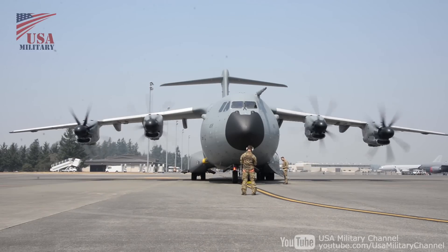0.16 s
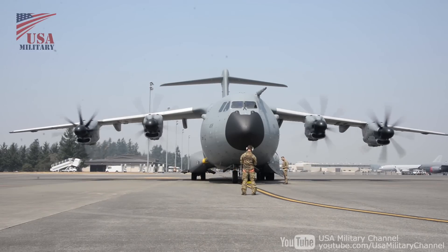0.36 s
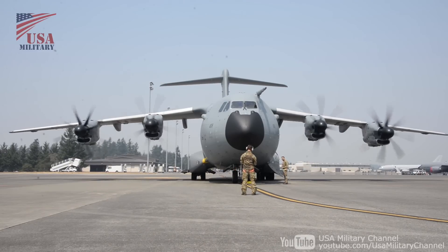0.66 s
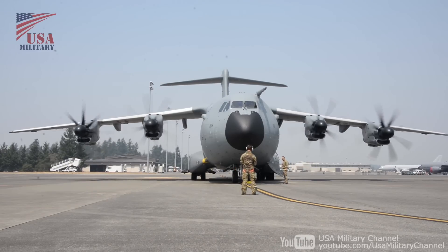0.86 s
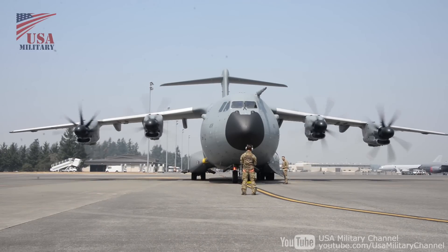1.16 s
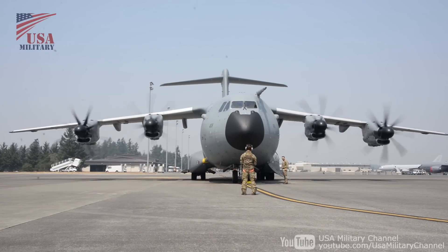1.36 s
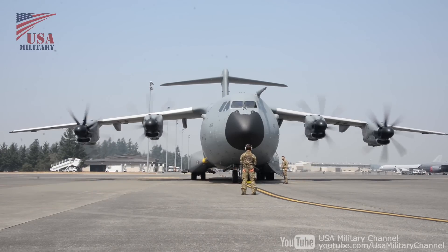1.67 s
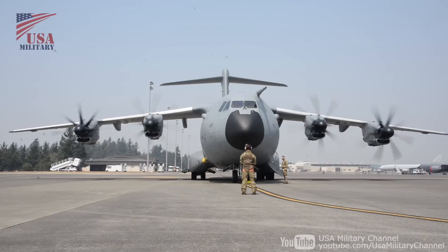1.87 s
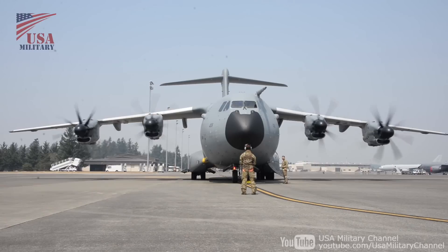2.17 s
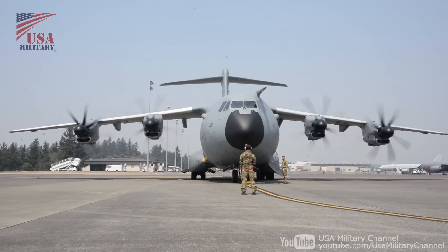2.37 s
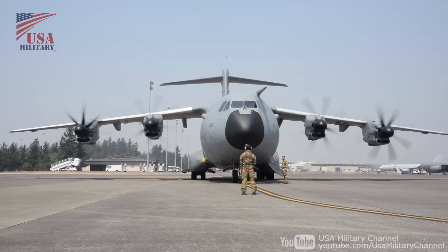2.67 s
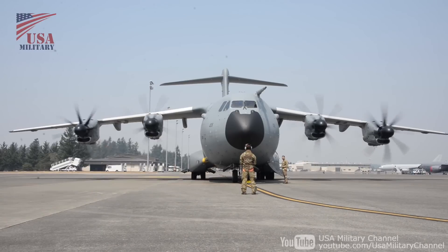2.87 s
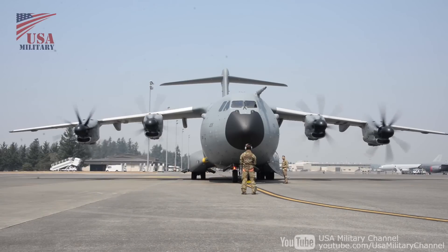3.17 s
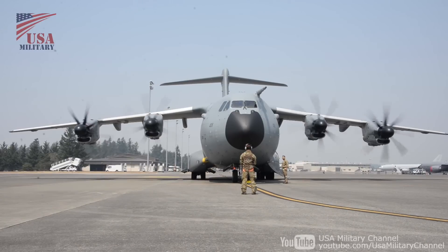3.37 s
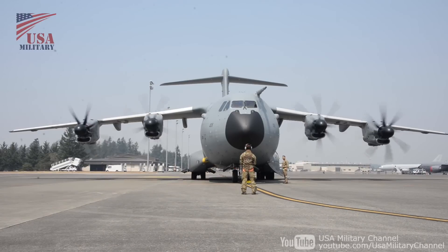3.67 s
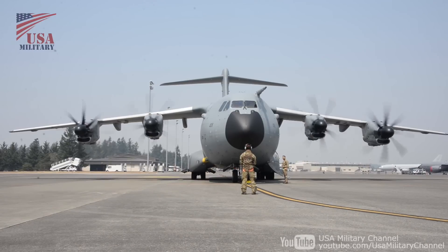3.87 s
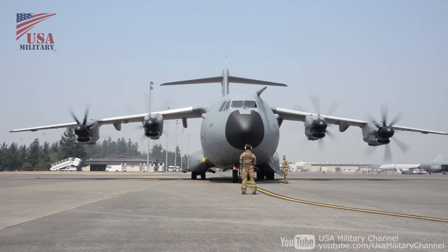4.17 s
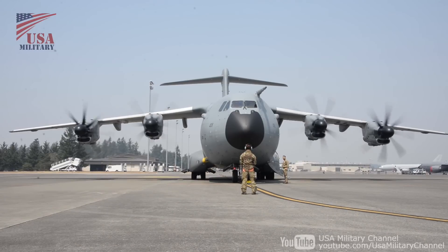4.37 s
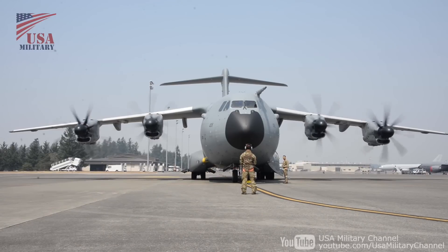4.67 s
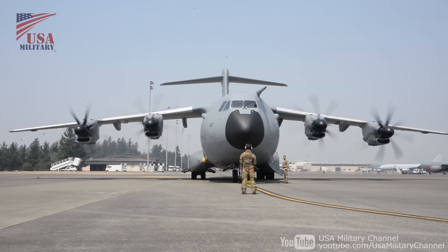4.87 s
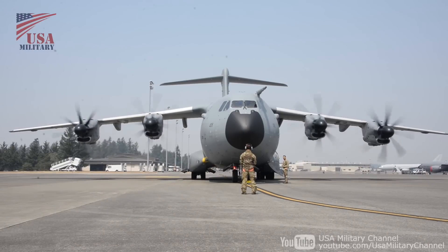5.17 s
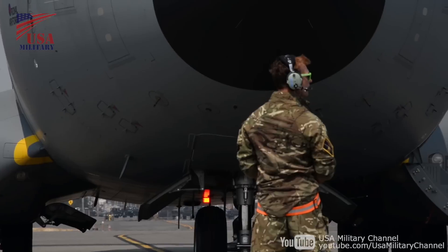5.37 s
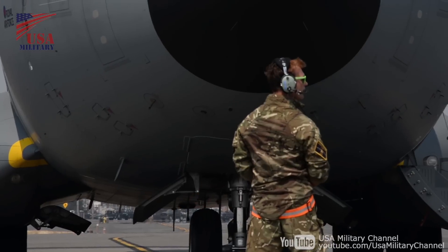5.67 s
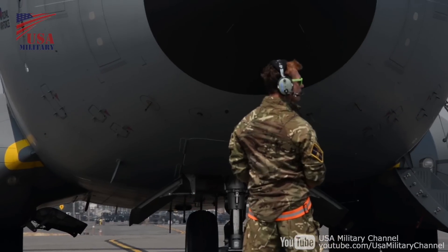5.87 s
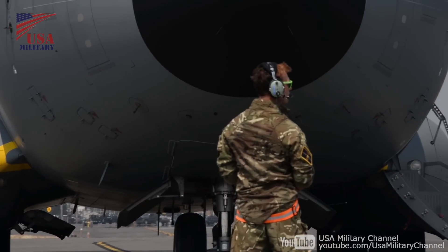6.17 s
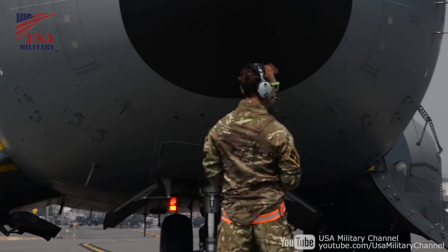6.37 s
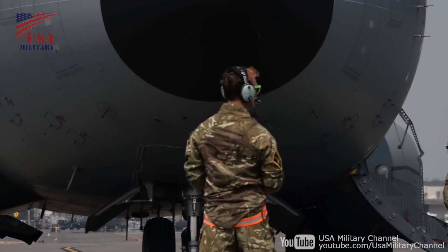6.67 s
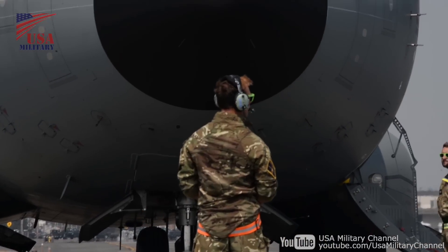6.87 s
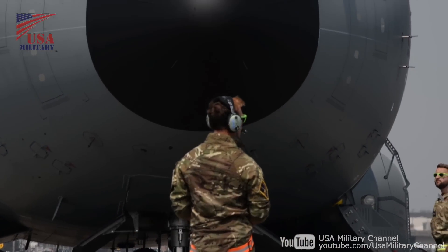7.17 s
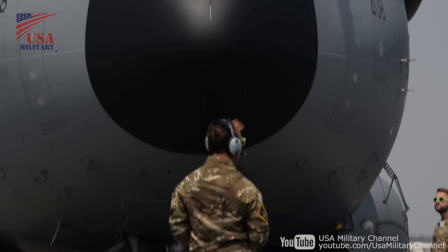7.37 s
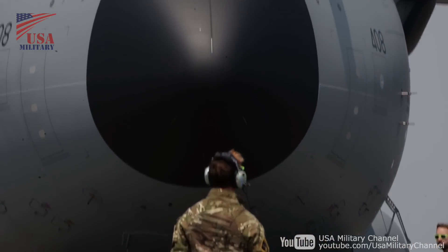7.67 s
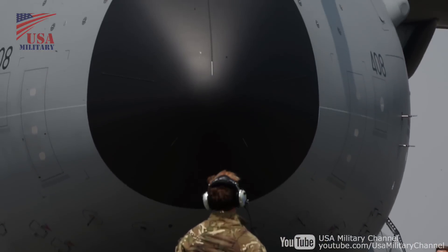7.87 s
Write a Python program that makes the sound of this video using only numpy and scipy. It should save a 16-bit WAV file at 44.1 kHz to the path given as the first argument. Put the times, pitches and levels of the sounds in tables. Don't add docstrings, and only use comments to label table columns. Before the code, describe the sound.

Continuous turboprop noise outdoors: piercing compressor tones chopped by propellers and blurred by moving air, with rushing air and a far roar beneath. Faint gear tones beat and a low buzz hums, rattling briefly a few times before the cut. After about five seconds the second position has a weaker high whine, more blade-tip rush and wavering low whine. Centred single-microphone sound with light hiss and dull extreme treble.

```python
import sys
import numpy as np
from scipy import signal
from scipy.fft import rfft, irfft, next_fast_len
from scipy.io import wavfile

SR = 44100
rng = np.random.default_rng(int(sys.argv[2]) if len(sys.argv) > 2 else 0)


def boost(x):
    u = np.asarray(x, float) / 20
    return 10 ** u


def materialize(psi):
    bounded = np.clip(np.atleast_2d(psi).T, -1, 1)
    quanta = np.round(bounded * 32767).astype(np.int16)
    wavfile.write(sys.argv[1], SR, quanta)


N = 354123
TIME = np.arange(N) / SR
STEP = 16
SLOW = np.arange(next_fast_len(N // STEP + 1)) * STEP / SR
CUT_S = 5.32


def curve(rows, time=TIME):
    s, *columns = np.transpose(rows)
    return [np.interp(time, s, column) for column in columns]


def coloured(points, db):
    hz, gain_db = np.transpose(points)
    size = next_fast_len(N)
    log_hz = np.log(np.arange(1, size // 2 + 2) * SR / size)
    gain = boost(np.interp(log_hz, np.log(hz), gain_db, right=-80))
    noise = irfft(rfft(rng.standard_normal(size)) * gain, size)[:N]
    return noise * boost(db) / np.std(noise)


def fading(width_hz):
    pole = np.exp(-np.pi * width_hz * STEP / SR)
    white = rng.standard_normal((2, 2 * len(SLOW)))
    gain = np.sqrt((1 - pole ** 2) / 2)
    wander = signal.lfilter([gain], [1, -pole], white[0] + 1j * white[1])
    return wander[len(SLOW):]


def walk(rate_hz):
    return np.sqrt(2) * np.interp(TIME, SLOW, np.real(fading(rate_hz)))


def tone(hz, db, drift_hz, flutter_db, rate_hz, twin=0, slip=0):
    cycles = np.cumsum(hz + drift_hz * walk(rate_hz)) / SR
    wave = np.sin(2 * np.pi * cycles) + twin * np.sin(2 * np.pi * (cycles + slip))
    return np.sqrt(2) * boost(db + flutter_db * walk(rate_hz)) * wave


def harmonics(rows, hz, time):
    return sum(np.sqrt(2) * boost(db) * np.cos(2 * np.pi * round(k) * hz * time) for k, db in rows)


# multiple of the buzz rate, level/dB
BUZZ_MULTIPLES = [(1, -36), (3, -45.5), (5, -52)]
# multiple of the mains rate, level/dB, start of fade t/s, fade [dB per s]
HUM_MULTIPLES = [(1, -35.5, .5, 0.6), (2, -36.5, 2.5, 3), (3, -52, 3, -0.1), (4, -47.5, 3.5, 0.3),
                 (5, -47.5, 3.2, 2), (6, -60, 4.8, 0)]
# t/s, boost level/dB, half length t/s
RATTLES = [
    (3.55, 8, 0.1),
    (4.29, 11, 0.074),
    (4.75, 7, 0.13),
    (5.15, 10.5, 0.17),
]


def hum():
    buzz_hz, mains_hz = 29.972, 60.01
    pulse_s = .024
    rattle_db = sum(db * np.exp(-((TIME - s) / half_s) ** 2) for s, db, half_s in RATTLES)
    rows = []
    for k, db, fade_s, fade in HUM_MULTIPLES:
        faded_db = db - fade * np.maximum(TIME - fade_s, 0)
        rows.append((k, faded_db + rattle_db * (round(k) == 5)))
    lead_s = .0053 * (TIME > CUT_S)
    buzz = harmonics(BUZZ_MULTIPLES, buzz_hz, TIME - pulse_s)
    return buzz + harmonics(rows, mains_hz, TIME - pulse_s + lead_s)


# f/Hz, level/dB [per Hz]
ROAR = [(5, -10), (45, -2), (100, 2.5), (250, -2), (500, -5.5), (1200, -8), (2500, -5), (5000, -6.5),
        (7000, -13), (9500, -11), (13500, -12), (16000, -27)]


def far_roar():
    return coloured(ROAR, db=-28.5) * boost(0.23 * walk(rate_hz=1.9))


# t/s, level/dB
TIP_RUSH = [(0, -41), (4.6, -64), (5.4, -45), (6.1, -41), (6.2, -34.5), (6.35, -38), (7.0, -39),
            (7.6, -40.5), (8.03, -45)]


def blade_tips():
    rush = coloured([(1100, -20), (1500, -15), (1850, 2), (2300, -15), (3000, -6)], db=1.5)
    return rush * boost(curve(TIP_RUSH)[0])


# t/s, f/Hz, level/dB
MESH_TWIN = [(0, 511.0, -40), (1.1, 512.1, -40), (1.6, 511.5, -48), (2.9, 510.9, -49), (3.9, 510.9, -44),
             (5.3, 510.9, -48), (8.03, 511, -52)]


def beating_mesh():
    mesh_hz, mesh_db = 507.7, -44.5
    twin_hz, twin_db = curve(MESH_TWIN)
    slip = np.cumsum(twin_hz - mesh_hz) / SR
    slip -= np.interp(.23, TIME, slip)
    return tone(mesh_hz, mesh_db, drift_hz=0.29, flutter_db=-0.2, rate_hz=3.8,
                twin=boost(twin_db - mesh_db), slip=slip)


# t/s, f/Hz, level/dB
WEAK_GEARS = [
    [(0, 519, -36), (1.2, 520, -70), (1.6, 519.5, -49), (6.3, 521, -50), (7.3, 525.7, -51.5),
     (8.03, 525, -40)],
    [(0, 484.4, -55), (5.1, 485, -53), (5.33, 477, -46), (5.8, 480, -47), (6.6, 482, -49), (7.1, 477, -46),
     (8.03, 490.5, -62)],
]


def gearboxes():
    weak = sum(tone(*curve(rows), drift_hz=1.12, flutter_db=2.5, rate_hz=3.07) for rows in WEAK_GEARS)
    return beating_mesh() + weak


# t/s, f/Hz, level/dB
SPOOL_UP = [(0, 3060, -40), (.3, 3070, -41), (.8, 3230, -42), (1.5, 3280, -54), (2.3, 3370, -41),
            (2.8, 3410, -44), (3.5, 3530, -37), (4.4, 3630, -51), (5.3, 3650, -46.5), (5.33, 3790, -70),
            (8.03, 3800, -72)]


def spooling_engine():
    return tone(*curve(SPOOL_UP), drift_hz=5.7, flutter_db=1, rate_hz=7.6)


# t/s, whine level/dB, lean to top whines level/dB, to middle ones level/dB
WIND_PATH = [(0, -13.5, 0.5, 1), (.3, -13.5, 0.5, 1), (.6, -17.5, 0.5, 0), (1.12, -15, -2.5, 0.5),
             (1.7, -17.5, -1.5, -1), (1.95, -17, -2, 1), (2.62, -23.5, 1, -0.5), (3.03, -17.5, -1, 0.5),
             (3.6, -20, 2, 2.5), (3.82, -16.5, 1, 0), (4.75, -14, -1.5, -0.5), (5.318, -18.5, 0.5, -0.5),
             (5.322, -27.5, 1.5, 1), (5.75, -26.5, 0.5, -4), (6.75, -22, 1, 1), (7.1, -23, 0, 1),
             (7.5, -21, -1.5, 0), (8.03, -26, 1, 0)]


def layer(law, time):
    usual_db = -17
    level_db, top_db, middle_db = curve(WIND_PATH, time)
    db, per_swell, per_top, per_middle, second_db = law
    swell_db = per_swell * (level_db - usual_db)
    return db + swell_db + per_top * top_db + per_middle * middle_db + second_db * (time > CUT_S)


# f/Hz, level/dB [per Hz]
INTAKE = [(1800, -20), (3000, -9), (3600, -1.5), (4300, -1), (5300, 0.5), (6400, -1), (7300, -3.5),
          (8200, -6), (9000, -7), (10000, -16)]
INTAKE_LAW = (-1.35, 0.6, 0.33, -0.033, -2.3)


def intake_air():
    level_db = layer(INTAKE_LAW, TIME) + 1.1 * walk(rate_hz=7.4)
    return coloured(INTAKE, db=-24.5) * boost(level_db)


# multiple of the chopping rate, level/dB
SIDEBANDS = [(-2, -6), (-1, -7), (2, -7), (3, -21.5), (4, -9.5)]
# multiple of shaft speed, level/dB
FAR_PAIR = [(12, -9), (14, -9.5)]


def shaft_order(row, swell_db, blur, direct):
    shaft_hz, chop_hz = 400, 23.3
    skirt_lean = .2
    order, db, first_db, side_db, skirt_db, skirt_hz = row
    order = round(order)
    share = np.clip(direct, 0, 1)
    envelope = np.sqrt(share) + np.sqrt(1 - share) * fading(blur * order)
    shift = np.exp(2j * np.pi * skirt_lean * skirt_hz * SLOW)
    envelope += boost(skirt_db) * fading(skirt_hz) * shift
    bands = [(1, first_db)] + [(round(k), band_db + side_db) for k, band_db in SIDEBANDS]
    for which, far_db in FAR_PAIR:
        if round(which) == order:
            bands += [(6, far_db), (7, far_db)]
    for k, band_db in bands:
        chop = np.exp(2j * np.pi * k * chop_hz * SLOW)
        envelope += boost(band_db) * fading(blur * order) * chop
    return order * shaft_hz, boost(db + swell_db) * envelope


def carry(voices):
    size = len(SLOW) * STEP
    spectrum = np.zeros(size // 2 + 1, complex)
    for hz, envelope in voices:
        first = round(hz * size / SR) - len(SLOW) // 2
        spectrum[first:first + len(SLOW)] += np.fft.fftshift(np.fft.fft(envelope))
    return irfft(spectrum, size)[:N] * STEP / np.sqrt(2)


# first upper copy level/dB,
# other copies level/dB, skirt level/dB; last the skirt width f/Hz
LOW_ORDERS = [(5, -0.31, -8.5, -4.5, -9, 60)]
FAINT_ORDERS = [(7, -49, -2.5, -26, -3, 41), (8, -53, 1, -5, -4, 60)]
LOWER_ORDERS = [(10, -13, -3.5, -0.5, 2.7, 160)]
MAIN_ORDERS = [(12, -5, 0.5, -3, 1.5, 160), (13, -21.5, -13, 4.5, 7, 100)]
MIDDLE_ORDERS = [(14, -7.5, -1.1, -1, 3.6, 190), (15, -13.5, -0.13, -2, 7.7, 160)]
TOP_ORDERS = [(17, -3.5, 0, -0.72, 4, 170), (20, -19, 0, 0, -4, 180), (23, -26, 0, 0, -14, 100)]
# t/s, level/dB
LOW_WHINE = [(0, -30.5), (.55, -38), (.85, -32), (1.3, -40), (2.45, -48), (2.95, -37.5), (4.05, -38),
             (4.35, -33), (4.6, -36), (5.3, -37), (5.5, -38.5), (6.1, -38.5), (6.6, -30), (6.9, -39),
             (7.1, -30), (7.6, -35), (8.03, -43)]
MAIN_LAW = (-21.5, 0.98, -0.7, -0.1, 0.5)
MIDDLE_LAW = (-24, 1.06, -0.6, 1.8, 0.8)
TOP_LAW = (-29.5, 1.1, .9, -0.3, 0.2)


def gusty(law):
    return layer(law, SLOW) + .8 * np.real(fading(3))


def compressor_whine():
    main_db, middle_db, top_db = gusty(MAIN_LAW), gusty(MIDDLE_LAW), gusty(TOP_LAW)
    low_db = curve(LOW_WHINE, SLOW)[0]
    high = [(LOWER_ORDERS, (main_db + middle_db) / 2), (MAIN_ORDERS, main_db),
            (MIDDLE_ORDERS, middle_db), (TOP_ORDERS, top_db)]
    low = [(LOW_ORDERS, low_db), (FAINT_ORDERS, 0)]
    voices = [shaft_order(row, db, blur=0.54, direct=0.081) for rows, db in high for row in rows]
    voices += [shaft_order(row, db, blur=0.53, direct=1.0) for rows, db in low for row in rows]
    return carry(voices)


def scene():
    background = hum() + far_roar() + blade_tips()
    engines = gearboxes() + spooling_engine() + intake_air() + compressor_whine()
    mono = background + engines
    return np.array([mono, mono])


def band_limit(x):
    return signal.sosfilt(signal.butter(12, 15760, fs=SR, output="sos"), x)


# f/Hz, level/dB [per Hz]
HISS = [(10, -7), (60, 2.5), (1000, -0.5), (3000, -1.5), (9000, -1.5), (14000, -2.5), (16000, -6.5)]


def record(dry):
    headroom = 1.5
    rounded = headroom * np.tanh(dry / headroom)
    hiss = np.array([coloured(HISS, db=-29), coloured(HISS, db=-29)])
    return band_limit(rounded + hiss)


dry = scene()
out = record(dry)
materialize(out)
```